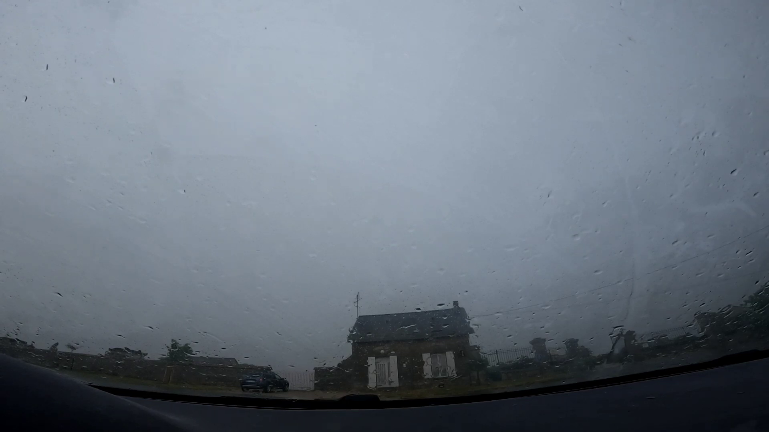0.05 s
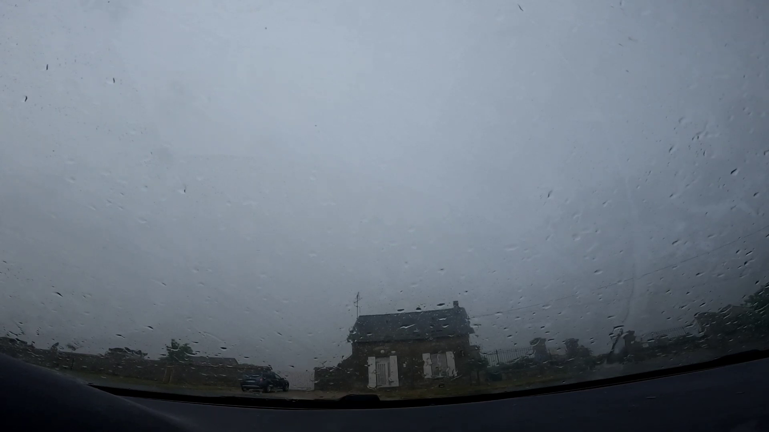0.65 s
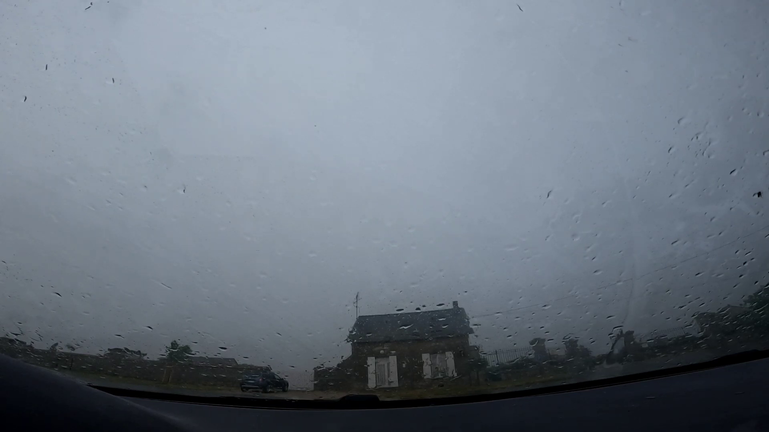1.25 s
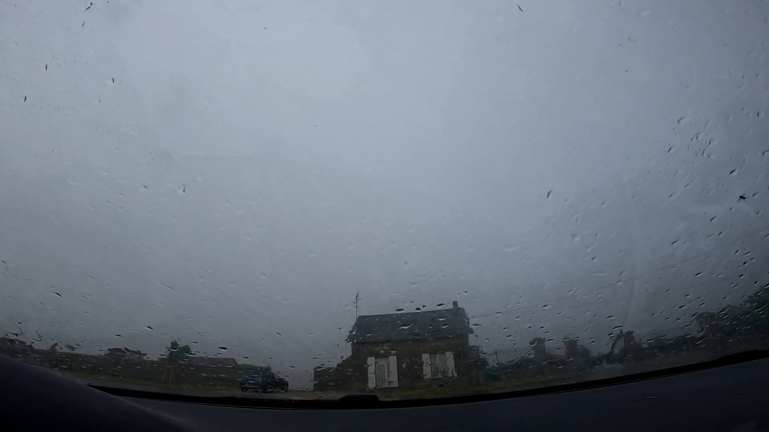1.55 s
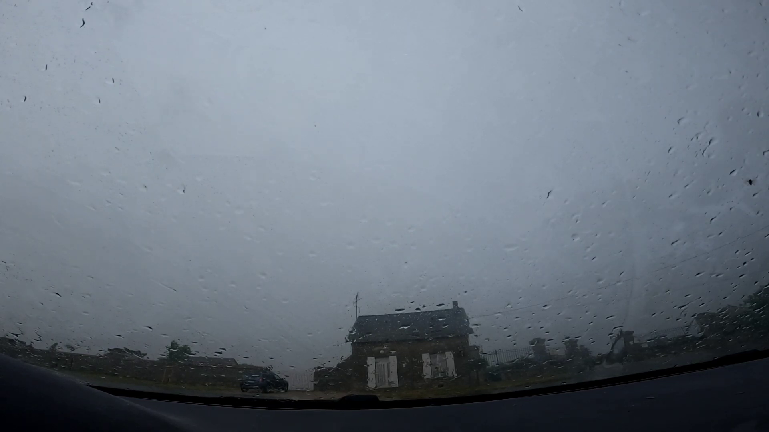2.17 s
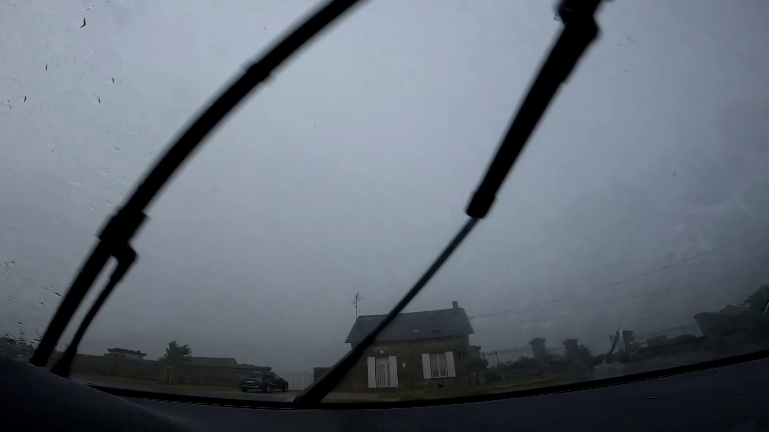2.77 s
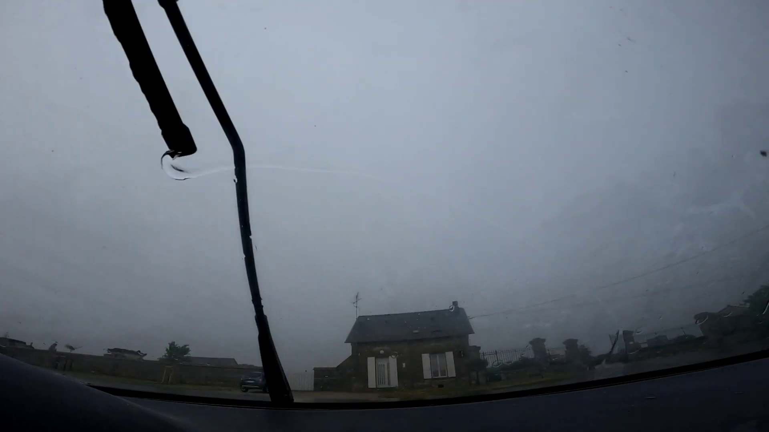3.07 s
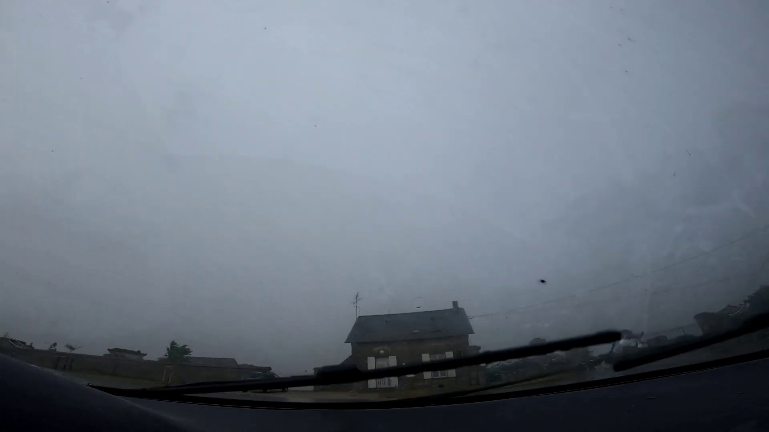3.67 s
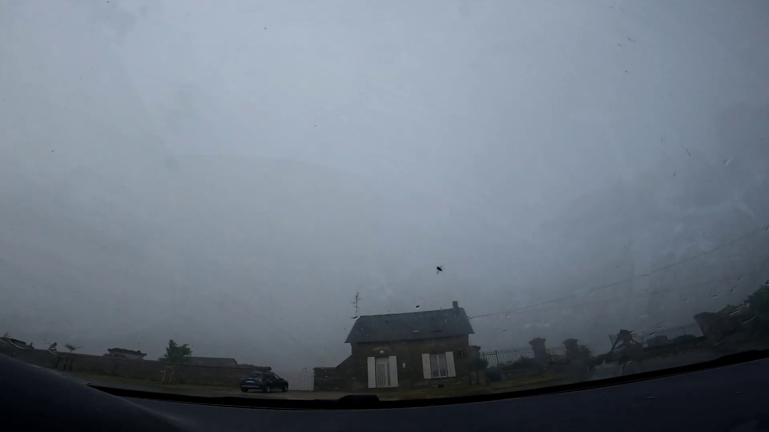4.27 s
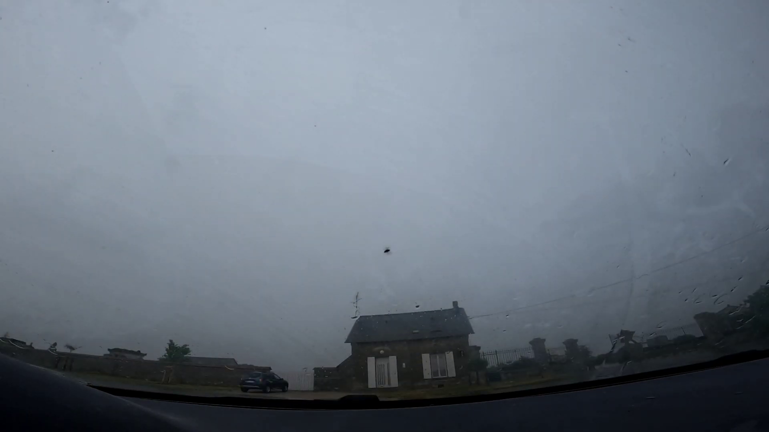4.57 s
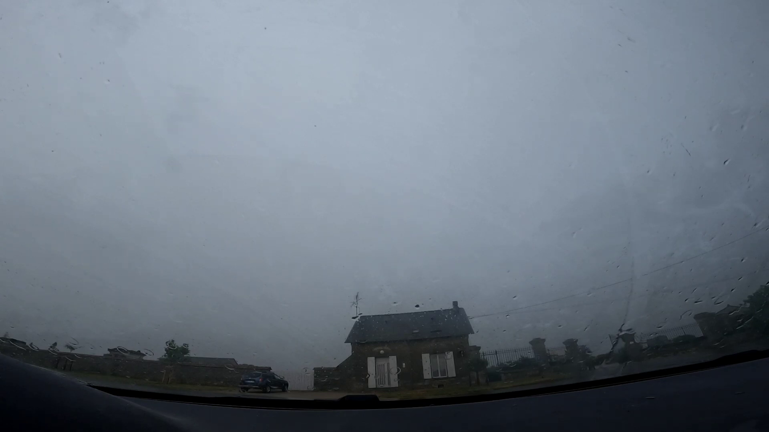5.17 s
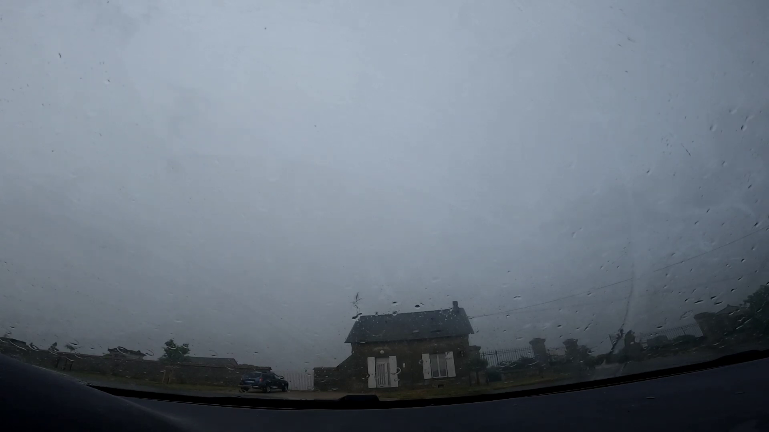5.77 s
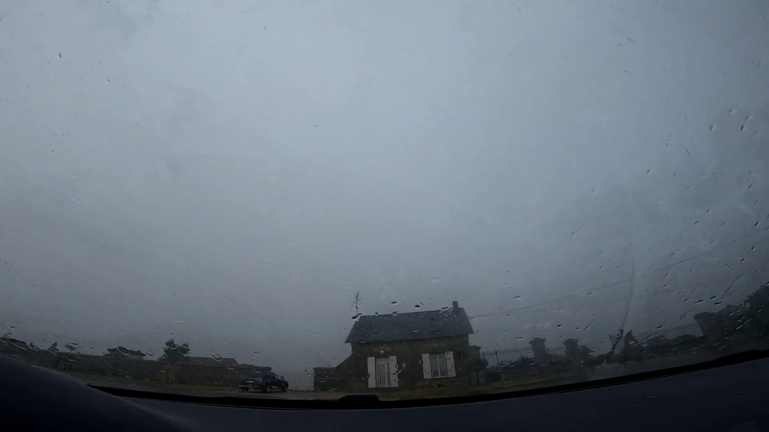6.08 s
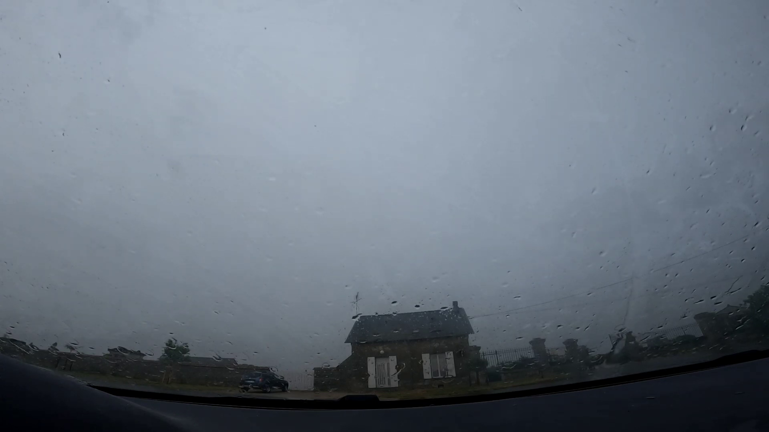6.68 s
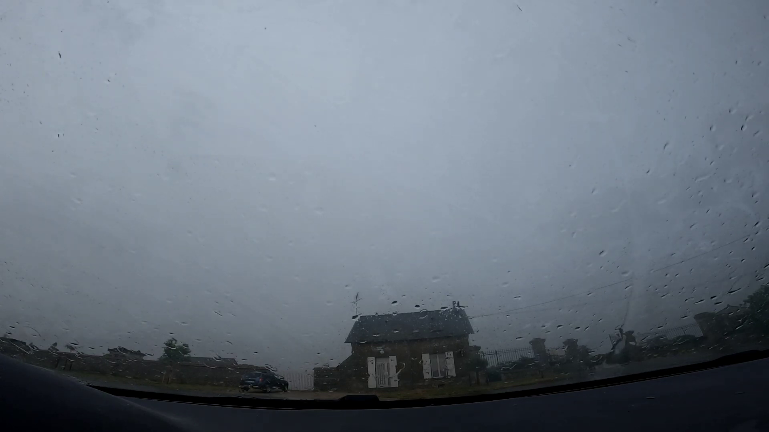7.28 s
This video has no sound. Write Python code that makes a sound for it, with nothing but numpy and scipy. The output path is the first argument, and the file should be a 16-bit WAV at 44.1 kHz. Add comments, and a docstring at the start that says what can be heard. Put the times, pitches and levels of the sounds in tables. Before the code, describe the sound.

Inside a car, rain beats on roof and windscreen; controls click, the wipers sweep once and far thunder booms.

```python
"""Heavy rain inside a parked car

Drops drum on the steel roof and tick on the windscreen. Plastic controls knock and rub, then the
wipers make one sweep, humming, juddering and thumping the body as they start, turn and park.
From there on distant thunder rolls and booms in the cabin."""
import sys
import numpy as np
from scipy import signal
from scipy.fft import rfft, irfft, next_fast_len
from scipy.io import wavfile
from scipy.ndimage import uniform_filter1d

SR = 44100
rng = np.random.default_rng(int(sys.argv[2]) if len(sys.argv) > 2 else 0)


def generate_wav(signal):
    """Clip the signal to [-1, 1] and save it as 16-bit WAV at the path in sys.argv[1]."""
    frames = np.transpose(np.atleast_2d(signal))
    scaled = np.clip(frames, -1, 1) * 32767
    pcm = np.round(scaled).astype(np.int16)
    wavfile.write(sys.argv[1], SR, pcm)


N = 323253

# fine spray off the glass (frequency [Hz], density [dB])
SPRAY_SPECTRUM = [(4000, -10), (7000, 9), (9000, -9), (12800, -4), (15500, -25.5)]
# booming car body (frequency [Hz], density [dB])
BOOM_SPECTRUM = [(80, -20.5), (100, -8.5), (125, 3), (145, -3), (170, -7), (225, -7.5), (300, -15),
                 (400, -25), (600, -30)]
# hollow knock (frequency [Hz], density [dB])
CLUNK_SPECTRUM = [(200, 9.5), (340, 4), (450, 1), (580, -21), (680, -26)]
# buzzing panel (frequency [Hz], density [dB])
PANEL_SPECTRUM = [(740, -22), (840, -3), (900, 0), (950, -2), (1010, -22)]


def roof():
    """Drops drum on the lined steel roof; sparser drops, in stronger flurries, set one panel ringing."""
    # whole roof (frequency [Hz], density [dB])
    steel = [(150, -37), (220, -20), (330, -10.5), (480, -8), (600, -10), (800, -10.5), (1000, -11.5),
             (1200, -10), (1400, -10), (1800, -17.5), (2600, -22.5)]
    # ringing panel (frequency [Hz], density [dB])
    panel = [(790, -22), (880, -4), (940, 0), (990, -4), (1080, -24)]
    drumming = shower(steel, per_s=1400, size_db=3, flurry_db=1.5, t60_s=0.079, cabin_db=-8.5, spots=30)
    ringing = shower(panel, per_s=240, size_db=2, flurry_db=3, t60_s=0.085, cabin_db=-10, spots=16)
    return from_db(9) * drumming + from_db(3) * ringing


def windscreen():
    """Drops on bare glass are short and bright; some tick hard and dry, some burst into spray."""
    # glass patter (frequency [Hz], density [dB])
    glass = [(1200, -10), (2000, -5.5), (2900, 0), (4000, -2), (5200, -6), (6300, -12.5), (7400, -14.5),
             (8500, -23), (12500, -26.5), (15000, -37)]
    # hard ticks (frequency [Hz], density [dB])
    tick = [(1700, -4), (3500, 0), (7000, -6), (8500, -16), (12500, -19), (15000, -32)]
    patter = shower(glass, per_s=1500, size_db=2.5, flurry_db=2, t60_s=0.021, cabin_db=-13, spots=40)
    ticks = shower(tick, per_s=32, size_db=1.2, flurry_db=3, t60_s=0.009, cabin_db=-20, spots=20)
    spray = shower(SPRAY_SPECTRUM, per_s=210, size_db=1.5, flurry_db=-7.5, t60_s=0.035,
                   cabin_db=-26.5, spots=20)
    return from_db(7.5) * patter + from_db(-3.5) * ticks + from_db(-10.5) * spray


def shower(spectrum, per_s, size_db, flurry_db, t60_s, cabin_db, spots):
    """Uneven drops land in flurries on many spots, each with its own ring; rms 1."""
    landings = np.flatnonzero(rng.random(N) < per_s * from_db(flurry_db * drift(14)) / SR)
    weights = np.minimum(rng.exponential(1, N)[landings], 4.5)
    gains = from_db(size_db * weights) * rng.choice([-1, 1], N)[landings]
    struck = rng.integers(0, spots, N)[landings]
    rings = [tap(spectrum, t60_s, cabin_db, cabin_t60_s=0.11) for _ in range(spots)]
    out = np.zeros((2, N))
    for sample, gain, spot in zip(landings.tolist(), gains, struck):
        add(out, sample / SR, gain * rings[spot])
    return unit_rms(out)


def fat_drops():
    """Big drops splat and spray, each ticking with its own brief pitch; lesser strays fall at random."""
    # biggest drops on the glass (time [s], level [dB], spray level [dB], tick pitch [Hz])
    drops = [(0.0485, -29.5, -45, 4100), (0.186, -34, -66, 3600), (0.7346, -36, -49, 5300),
             (2.0153, -40, -60, 2840), (2.2767, -41, -70, 2950), (2.517, -33, -62, 2660),
             (2.8953, -31.5, -63, 3000), (3.0889, -36, -50, 4900), (3.3767, -31.5, -64, 2430),
             (3.6496, -29, -51, 2780), (4.294, -35, -65, 3830), (4.5982, -33, -67, 3760),
             (5.1094, -40, -52, 2640), (5.1298, -32, -65, 3020), (5.1904, -39, -42, 3400),
             (5.4006, -34, -58, 4390), (5.411, -32, -52, 2400), (5.5205, -28.5, -66, 3000),
             (5.8765, -32, -59, 2450), (5.9579, -36, -60, 2890), (6.1476, -34, -52, 3220),
             (6.2103, -33.5, -69, 3640), (6.318, -33, -61, 2780), (6.5866, -37, -63, 2830),
             (6.6767, -31, -61, 2430)]
    # splat (frequency [Hz], density [dB])
    splat_spectrum = [(900, 6), (1500, 11.5), (2600, 7.5), (4000, 9), (5500, 4), (7500, -13), (9000, -27),
                      (14000, -25)]
    # tick pitch of strays (lowest [Hz], highest [Hz])
    stray_range_hz = (2300, 3800)
    strays_per_s, stray_db, stray_spray_db, spread_db = 5, -40, -68, 1.5
    gap_draw, size_draw, pitch_draw = rng.random((80, 3)).T
    times_s = np.cumsum(-np.log(1 - gap_draw)) / strays_per_s
    sizes_db = spread_db * (2 * size_draw - 1)
    pitches_hz = np.interp(pitch_draw, [0, 1], stray_range_hz)
    strays = [(at_s, stray_db + db, stray_spray_db + db, hz)
              for at_s, db, hz in zip(times_s, sizes_db, pitches_hz) if at_s < (N - 1) / SR]
    out = np.zeros((2, N))
    for at_s, level_db, spray_db, hz in list(drops) + strays:
        splat = tap(splat_spectrum, t60_s=0.028, cabin_db=-13, cabin_t60_s=0.11)
        tick = ring(signal.unit_impulse(splat.shape[1]), hz, t60_s=0.041)
        spray = tap(SPRAY_SPECTRUM, t60_s=0.039, cabin_db=-12, cabin_t60_s=0.088)
        add(out, at_s, from_db(level_db - 6) * (splat + tick) + from_db(spray_db + 1.5) * spray)
    return out


def roof_drips():
    """A heavy drip dents a roof panel, which swings a few times under its lining."""
    # drips (time [s], peak [dB], panel pitch [Hz])
    drips = [(4.309, -10, 229), (5.382, -12, 216), (6.337, -9, 213), (6.945, -10, 230)]
    out, t = np.zeros((2, N)), np.arange(SR // 10) / SR
    for at_s, peak_db, hz in drips:
        add(out, at_s, from_db(peak_db) * unit_peak(soft_push(t * hz, swell_cycles=0.66)))
        impact = tap(CLUNK_SPECTRUM, t60_s=0.043, cabin_db=-10, cabin_t60_s=0.1)
        add(out, at_s, from_db(peak_db - 36) * impact)
    return out


def thunder():
    """Lumpy rolls boom in the cabin over a deep rumble; a panel buzzes along."""
    # rolls (time [s], boom level [dB], rumble level [dB])
    rolls = [(3.74, -15, -52), (3.88, -20, -17), (4.02, -23, -20), (4.48, -19.5, -22.5), (4.6, -26, -16),
             (4.74, -19, -21.5), (5.0, -18.5, -24.5), (5.33, -18.5, -23.5), (5.58, -15.5, -17.5),
             (5.88, -23, -28), (6.1, -23.5, -24), (6.3, -19.5, -26.5), (6.83, -22.5, -25.5),
             (7.1, -20, -16), (7.33, -23.5, -22)]
    # deep rumble (frequency [Hz], density [dB])
    rumble_spectrum = [(22, -21), (28, -8.5), (36, -3), (55, -11), (75, -15), (110, -20)]
    # loudest booms (time [s], level [dB], push pitch [Hz])
    booms = [(4.07, -1.5, 149.3), (4.272, -3.5, 140), (4.539, -0.5, 145), (4.575, -8, 204),
             (4.622, -3.5, 147.4), (4.96, -3.5, 150.6), (5.46, -10.5, 184), (5.574, -1, 127.6),
             (5.664, -9.5, 115), (5.783, -11, 145.4), (6.924, -5, 132.7), (7.081, -3.5, 123.5)]
    start_s, rise_s, echo_s, echo_loss_db = 3.71, 0.094, 0.028, 2
    boom_db, rumble_db = curves(rolls)
    arrival = np.clip((np.arange(N) / SR - start_s) / rise_s, 0, 1)
    lumps_db = 1.65 * drift(24.4)
    boom = from_db(boom_db + lumps_db - 2.5) * steadied(noise(BOOM_SPECTRUM), 0.094)
    rumble = from_db(rumble_db - 0.5) * steadied(noise(rumble_spectrum), 0.36)
    buzz = from_db(-35 + 0.57 * boom_db) * noise(PANEL_SPECTRUM)
    echoes = [(at_s + echo_s, db - echo_loss_db, hz) for at_s, db, hz in booms]
    blows = body_blows(list(booms) + echoes, gain_db=-7.5, shudder_db=-10, swell_cycles=1.57)
    return arrival * (boom + rumble + buzz) + blows


def wiper_thumps():
    """Blades flip and arms jolt the body as the wipers start, reverse and park."""
    # jolts (time [s], level [dB], push pitch [Hz])
    jolts = [(2.424, -9, 173), (2.452, -14, 95), (2.502, -3.5, 85), (2.547, -7.5, 151), (3.205, -7.5, 94),
             (3.226, -14, 198), (3.286, -7, 85), (3.303, -4, 126), (3.323, -11.5, 85), (3.374, -8, 62.6),
             (3.712, -15.5, 161), (3.752, -6, 181), (3.777, -2.5, 151), (3.838, -11, 164), (3.872, -7, 167),
             (3.911, -8.5, 168)]
    return body_blows(jolts, gain_db=-2.5, shudder_db=-9.5, swell_cycles=0.58)


def wiper_strokes():
    """The motor hums highest and loudest mid-stroke; the blades judder as they set off, then glide."""
    # up and back (start [s], length [s], hum level [dB], judder level [dB])
    strokes = [(2.447, 0.78, -36.5, -19.5), (3.349, 0.37, -60, -19)]
    # blade judder (frequency [Hz], density [dB])
    judder_spectrum = [(40, -2), (58, -3.5), (85, -9.5), (115, -2), (180, -23), (260, -20.5)]
    loaded_hz, free_hz = 179, 206.7
    rise_s, fade_db_per_s = 0.035, 31.5
    t = np.arange(N) / SR
    speed, hum_gain, judder_gain = np.zeros((3, N))
    for start_s, length_s, hum_db, judder_db in strokes:
        swing = arch(start_s, length_s)
        since_s = np.maximum(t - start_s, 0)
        speed += swing
        hum_gain += from_db(hum_db) * swing
        judder_gain += from_db(judder_db - fade_db_per_s * since_s) * np.minimum(since_s / rise_s, 1)
    hum = wavering_tone(loaded_hz + (free_hz - loaded_hz) * speed, depth=0.0173, rate_hz=22)
    load_db = 3 * drift(15)
    judder = steadied(noise(judder_spectrum), 0.23)
    return hum_gain * from_db(load_db) * hum + judder_gain * judder


def wiper_squeak():
    """Rubber breaks loose from the glass in one rough, rising chirp."""
    start_s, length_s, start_hz, rise_hz_per_s = 2.466, 0.036, 1150, 9400
    hz = start_hz + rise_hz_per_s * np.clip(np.arange(N) / SR - start_s, 0, length_s)
    return from_db(-29.5) * arch(start_s, length_s) * wavering_tone(hz, depth=0.06, rate_hz=189)


def wiper_linkage():
    """The linkage clunks as it takes up its play; a panel rings along."""
    # clunks (time [s], level [dB], pitch [Hz], panel level [dB])
    clunks = [(2.428, -26, 330, -40), (2.489, -23, 394, -42), (2.505, -21.5, 510, -36),
              (3.229, -19, 315, -55), (3.296, -18.5, 356, -46), (3.314, -19.5, 317, -50),
              (3.764, -17.5, 295, -29.5), (3.797, -31, 328, -31), (3.879, -25.5, 273, -38)]
    out = np.zeros((2, N))
    for at_s, level_db, hz, panel_db in clunks:
        add(out, at_s, from_db(level_db) * clunk(hz, swell_cycles=1.16))
        panel = tap(PANEL_SPECTRUM, t60_s=0.11, cabin_db=-12, cabin_t60_s=0.13)
        add(out, at_s, from_db(panel_db) * panel)
    return out


def control_knocks():
    """Hard plastic snaps against its stop: a crack, a hollow clunk and a ringing housing."""
    # knocks (time [s], crack level [dB], treble tilt [dB/octave], ring level [dB], clunk level [dB])
    knocks = [(0.38, -23.5, 1.5, -40, -46), (0.707, -20.5, 3.5, -39.5, -26.5),
              (0.901, -22.5, 2, -34.5, -28), (1.012, -13, -1, -28.5, -39), (1.025, -19.5, 2, -27.5, -35),
              (1.031, -31, -5, -37, -43), (1.048, -21, -14, -45, -30.5)]
    # crack (frequency [Hz], density [dB])
    crack_spectrum = [(180, 18), (330, 8), (500, 0), (750, 14.5), (1600, 4), (2600, -7), (3500, -7),
                      (4300, -14), (5700, -11), (9000, -30), (14000, -36)]
    # housing modes (frequency [Hz], level [dB], t60 [s])
    modes = [(443, -17, 0.18), (674, -4, 0.21), (836, -6, 0.08), (901, 9.5, 0.11), (1004, -9, 0.21),
             (1290, -8, 0.19), (1455, -1, 0.13), (1740, 1, 0.07), (1820, -3, 0.066), (2460, -9, 0.066)]
    pivot_hz = 1500
    out, click = np.zeros((2, N)), signal.unit_impulse(SR // 2)
    for at_s, crack_db, tilt_db, ring_db, clunk_db in knocks:
        tilted = [(hz, db + tilt_db * max(0, np.log2(hz / pivot_hz))) for hz, db in crack_spectrum]
        crack = tap(tilted, t60_s=0.053, cabin_db=-12, cabin_t60_s=0.16)
        add(out, at_s, from_db(crack_db - 5) * crack)
        add(out, at_s, from_db(clunk_db) * clunk(hz=560, swell_cycles=1.2))
        housing = sum((-1) ** k * from_db(db + 0.8 * rng.standard_normal()) * ring(click, hz, t60_s)
                      for k, (hz, db, t60_s) in enumerate(modes))
        add(out, at_s, from_db(ring_db) * housing)
    return out


def control_thuds():
    """Dull thuds in the car body go with the knocks."""
    # thuds (time [s], level [dB], push pitch [Hz])
    thuds = [(0.402, -26.5, 75.6), (0.708, -21.5, 79), (0.728, -25, 74), (0.901, -22.5, 173),
             (0.92, -20, 121), (0.972, -22.5, 115), (1.015, -19, 137)]
    return body_blows(thuds, gain_db=6.5, shudder_db=-7, swell_cycles=0.79)


def small_part():
    """A small hard part rings briefly after the second knock."""
    # ring (time [s], level [dB], pitch [Hz], t60 [s])
    pings = [(0.732, -40, 5380, 0.056)]
    out = np.zeros(N)
    for at_s, level_db, hz, t60_s in pings:
        add(out, at_s, from_db(level_db) * ring(signal.unit_impulse(SR), hz, t60_s))
    return out


def plastic_rub():
    """Something slides over stiff plastic: grainy friction swells and excites narrow resonances."""
    # friction (frequency [Hz], density [dB])
    hiss_spectrum = [(220, 0), (700, -3.5), (1800, -13), (4500, -18), (7000, -32), (12000, -40)]
    # resonances (frequency [Hz], level [dB], t60 [s])
    modes = [(523, -38, 0.08), (1310, -51, 0.076), (1775, -50, 0.055), (2180, -57, 0.09),
             (2470, -47.5, 0.028), (2920, -60, 0.056), (3750, -56, 0.05)]
    friction = noise(hiss_spectrum) * from_db(2.5 * drift(120))
    singing = sum(from_db(db) * unit_rms(ring(friction, hz, t60_s)) for hz, db, t60_s in modes)
    swell = np.sqrt(np.abs(arch(start_s=1.545, length_s=0.3)))
    return swell * (singing + from_db(-38.5) * unit_rms(friction))


def storm_murmur(rain_db):
    """The storm's low murmur in the cabin swells with the rain."""
    # murmur (frequency [Hz], density [dB])
    spectrum = [(18, -2.5), (35, 3.5), (55, -1.5), (85, -5.5), (130, -3.5), (210, -7), (320, -11)]
    return from_db(-31.5 + 0.32 * (rain_db - rain_db.mean())) * steadied(noise(spectrum), 0.28)


def body_blows(blows, gain_db, shudder_db, swell_cycles):
    """Soft pushes set the car body booming; loose parts shudder after each."""
    # body modes (frequency [Hz], level [dB], t60 [s])
    modes = [(57.1, 2.5, 0.37), (90.7, 1, 0.16), (128.8, 4, 0.081), (170.7, 3.5, 0.13), (248, 1, 0.24),
             (306, -1, 0.13), (500, -28, .05)]
    rise_s, decay_s = 0.0048, 0.031
    out, t = np.zeros((2, N)), np.arange(SR // 3) / SR
    for at_s, level_db, push_hz in blows:
        push = soft_push(t * push_hz, swell_cycles)
        boom = unit_peak(sum(from_db(db) * ring(push, hz, t60_s) for hz, db, t60_s in modes))
        shudder = noise(BOOM_SPECTRUM, size=len(t)) * (1 - np.exp(-t / rise_s)) * np.exp(-t / decay_s)
        add(out, at_s, from_db(level_db + gain_db) * (boom + from_db(shudder_db) * shudder))
    return out


def clunk(hz, swell_cycles):
    """A hollow knock of a few swings, with the cabin's short echo."""
    echo = tap(CLUNK_SPECTRUM, t60_s=0.084, cabin_db=-12, cabin_t60_s=0.089)
    swing = soft_push(np.arange(echo.shape[1]) / SR * hz, swell_cycles)
    return unit_peak(swing) + from_db(-11) * echo


def tap(spectrum, t60_s, cabin_db, cabin_t60_s):
    """A blow on a damped panel: a burst of dense modes, then the cabin's short echo."""
    t, top_hz = np.arange(4096) / SR, spectrum[-1][0]
    attack = 1 - np.exp(-(t * top_hz / 2) ** 2)  # dull contacts build up more slowly
    decay = 1000 ** (-t / t60_s) + from_db(cabin_db) * 1000 ** (-t / cabin_t60_s)
    taper = 1 - (t / t[-1]) ** 2
    return noise(spectrum, size=len(t)) * attack * decay * taper


def noise(spectrum, size=N):
    """Coloured stereo noise, alike at both ears in the bass, more diffuse in the treble; rms 1."""
    # ear balance (frequency [Hz], left minus right [dB])
    balance = [(250, 0), (500, 3), (950, 4), (1400, 1), (2000, 0), (4000, .8), (8000, 1.5), (12000, 6)]
    # diffuseness (frequency [Hz], side minus mid [dB])
    width = [(30, -30.5), (125, -18.5), (250, -24.5), (500, -10.5), (1000, -11), (2000, -7), (4000, -7.5),
             (8000, -7), (12000, -6)]
    # phase between ears (frequency [Hz], left lead [rad])
    lead = [(90, 0.03), (300, 0.28), (950, -0.18), (1700, -0.97), (2200, -0.44), (3200, -.55), (5300, 0.2)]
    padded = next_fast_len(size, real=True)
    hz = np.maximum(np.fft.rfftfreq(padded, 1 / SR), 1)
    mid, side = rfft(rng.standard_normal((2, padded)))
    ears = np.array([[1], [-1]])
    skirts = 1 / (1 + (0.8 * spectrum[0][0] / hz) ** 4) / (1 + (0.8 * hz / spectrum[-1][0]) ** 6)
    gain = skirts * from_db(at_hz(spectrum, hz) + ears * at_hz(balance, hz) / 2)
    direct = mid * np.exp(1j * ears * at_hz(lead, hz) / 2)
    diffuse = side * ears * from_db(at_hz(width, hz))
    return unit_rms(irfft(gain * (direct + diffuse), padded)[:, :size])


def ring(push, hz, t60_s):
    """One mode: a unit click starts a decaying sine of height 1."""
    pole, step_rad = np.exp(-np.log(1000) / (t60_s * SR)), 2 * np.pi * hz / SR
    feedback = [1, -2 * pole * np.cos(step_rad), pole ** 2]
    return signal.lfilter([0, np.sin(step_rad)], feedback, push + 1e-18)


def soft_push(cycles, swell_cycles):
    """A to-and-fro push that swells for swell_cycles, then dies away."""
    return np.sin(2 * np.pi * cycles) * cycles * np.exp(-cycles / swell_cycles)


def wavering_tone(hz, depth, rate_hz):
    """A sine whose pitch wanders by the rms fraction depth."""
    return np.sin(2 * np.pi * np.cumsum(hz * (1 + depth * drift(rate_hz))) / SR)


def drift(rate_hz):
    """Smooth random wander; rms 1."""
    hop, settle = 40, 2000
    pole = np.exp(-2 * np.pi * hop * rate_hz / SR)
    white = rng.standard_normal(N // hop + settle + 2)
    slow = signal.lfilter([1], [1, -2 * pole, pole ** 2], white)[settle:]
    return np.interp(np.arange(N) / hop, np.arange(len(slow)), unit_rms(slow))


def steadied(x, window_s):
    """Level out a noise's slow swings, keeping its fine lumps."""
    return x / np.sqrt(uniform_filter1d(np.mean(x ** 2, axis=0), int(window_s * SR)) + 1e-9)


def arch(start_s, length_s):
    """Half a sine: 0 outside the span, 1 in its middle."""
    return np.sin(np.pi * np.clip((np.arange(N) / SR - start_s) / length_s, 0, 1))


def curves(rows):
    """Each column after the time column, at every sample."""
    times_s, *columns = np.transpose(rows)
    return [np.interp(np.arange(N) / SR, times_s, column) for column in columns]


def at_hz(points, hz):
    """Interpolate on a log-frequency axis."""
    points_hz, values = np.transpose(points)
    return np.interp(np.log(hz), np.log(points_hz), values)


def add(out, at_s, sound):
    start = round(at_s * SR)
    out[..., start:start + sound.shape[-1]] += sound[..., :N - start]


def from_db(db):
    return 10 ** (np.asarray(db) / 20)


def unit_rms(x):
    return x / np.sqrt(np.mean(x ** 2) + 1e-20)


def unit_peak(x):
    return x / np.abs(x).max()


def scene():
    """Rain and murmur throughout; controls, wipers and thunder in turn."""
    # rainfall swelling and easing (time [s], roof level [dB], windscreen level [dB])
    rainfall = [(0, -33, -43), (0.4, -36, -46.5), (0.6, -38, -49), (1.25, -40, -49.5), (1.95, -38, -48.5),
                (2.35, -35.5, -47.5), (2.78, -38.5, -49.5), (2.92, -36.5, -46), (3.35, -37.5, -48.5),
                (4.17, -40.5, -52), (4.65, -38, -49.5), (5.5, -37, -48.5), (5.72, -37.5, -49.5),
                (6.2, -37, -46.5), (6.5, -38.5, -48.5), (6.75, -36.5, -48), (7.33, -40, -52.5)]
    roof_db, glass_db = curves(rainfall)
    rain = from_db(roof_db - 9) * roof() + from_db(glass_db - 7.5) * windscreen()
    murmur = storm_murmur(roof_db)
    controls = control_knocks() + small_part() + plastic_rub() + control_thuds()
    wipers = wiper_thumps() + wiper_strokes() + wiper_squeak() + wiper_linkage()
    return rain + murmur + controls + wipers + thunder() + roof_drips() + fat_drops()


def record(dry):
    """The microphone dulls the highest treble; above that comes a steep cut."""
    rolloff_hz, cutoff_hz = 13200, 15700
    dulled = signal.sosfilt(signal.butter(10, rolloff_hz, fs=SR, output="sos"), dry)
    return signal.sosfilt(signal.ellip(10, 0.1, 80, cutoff_hz, fs=SR, output="sos"), dulled)


dry = scene()
out = record(dry)
generate_wav(out)
```